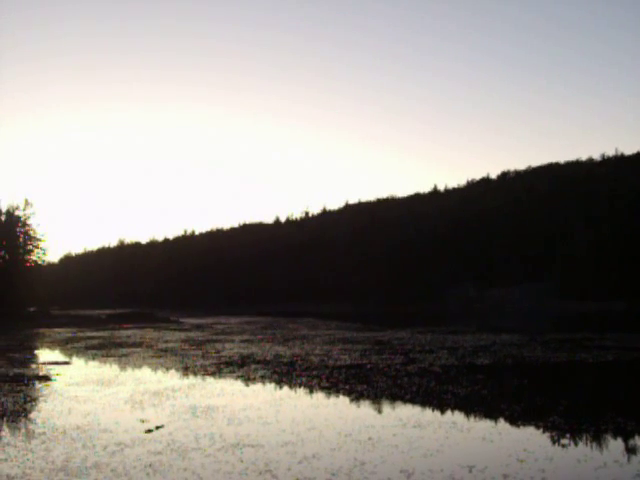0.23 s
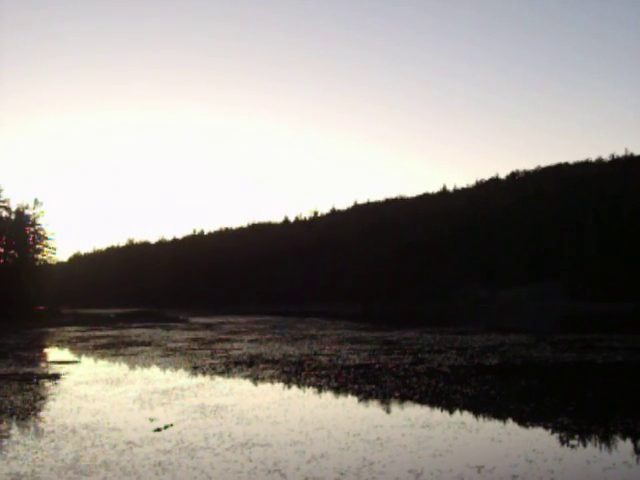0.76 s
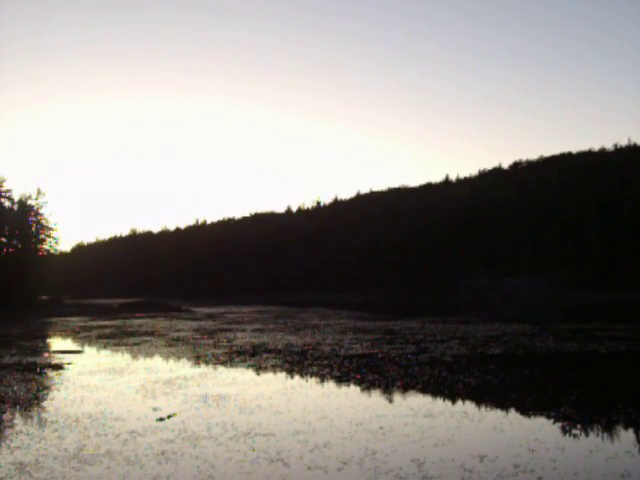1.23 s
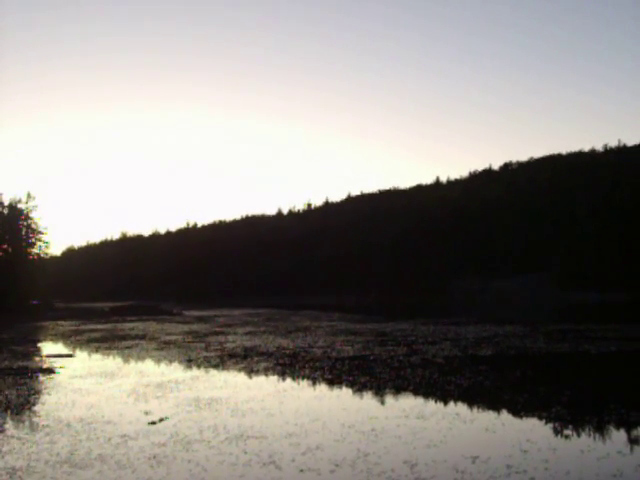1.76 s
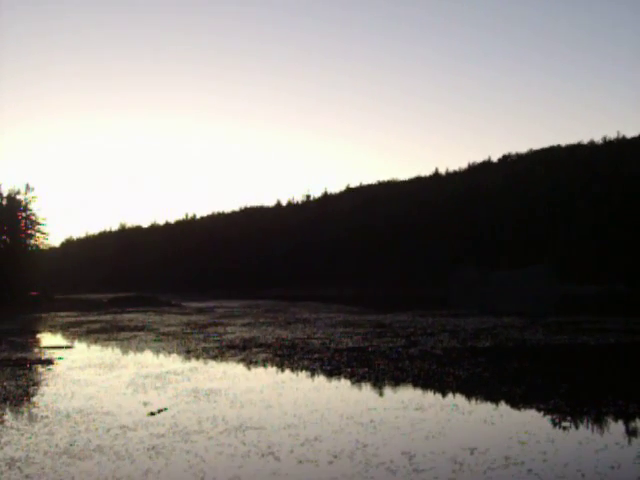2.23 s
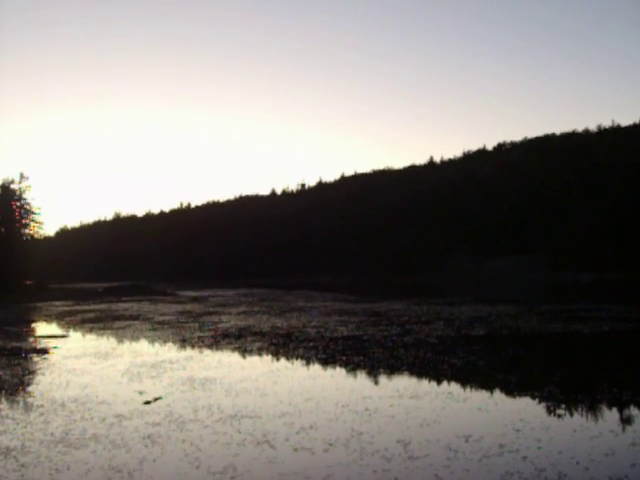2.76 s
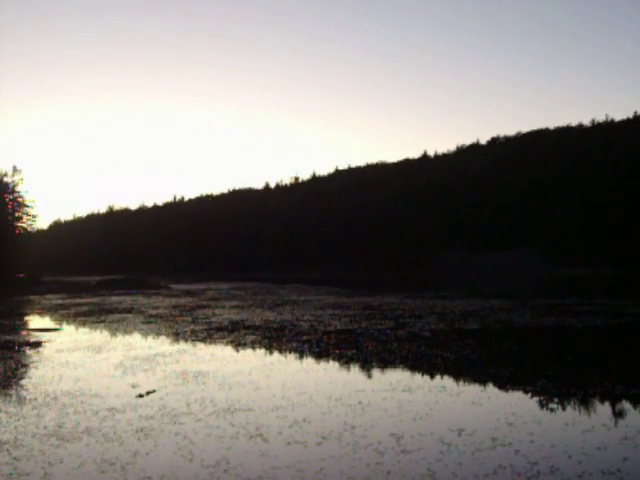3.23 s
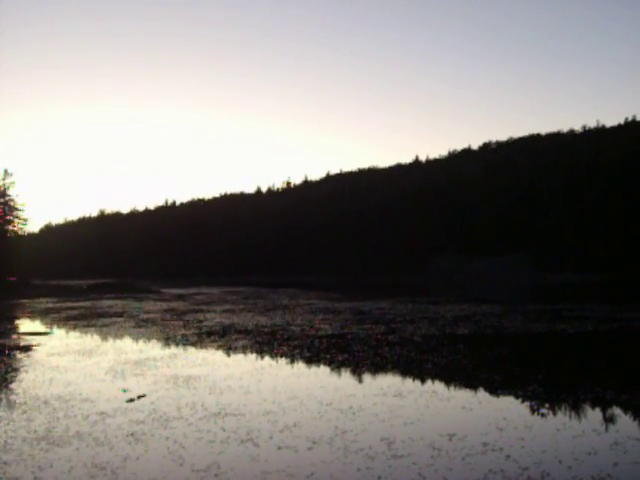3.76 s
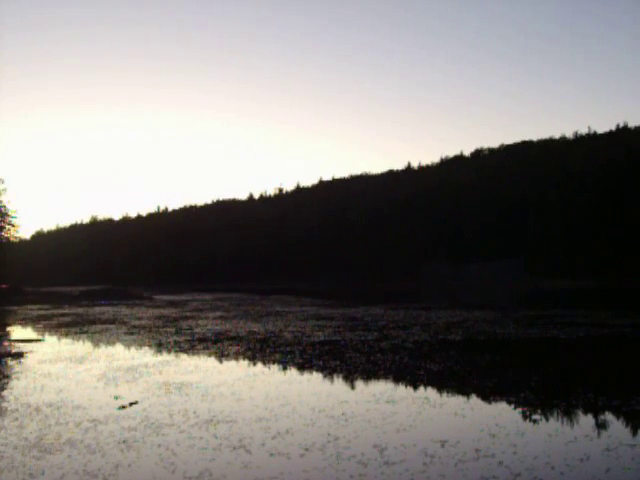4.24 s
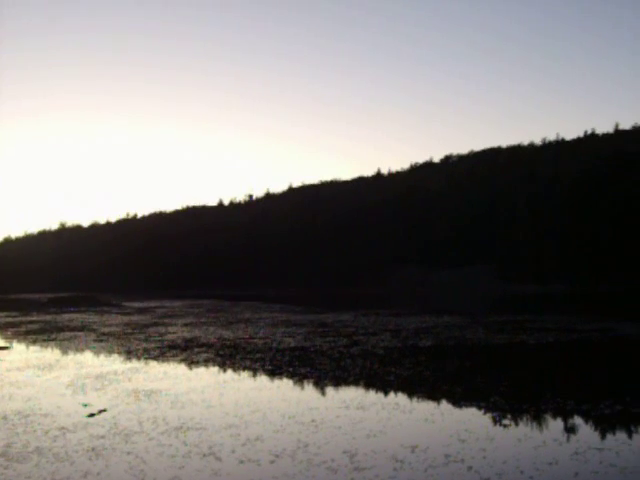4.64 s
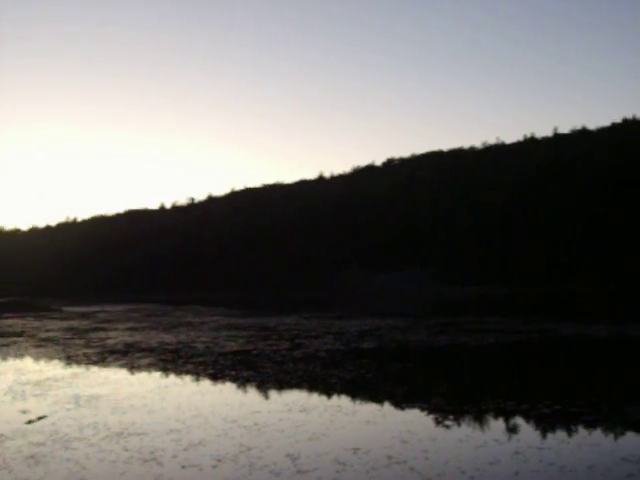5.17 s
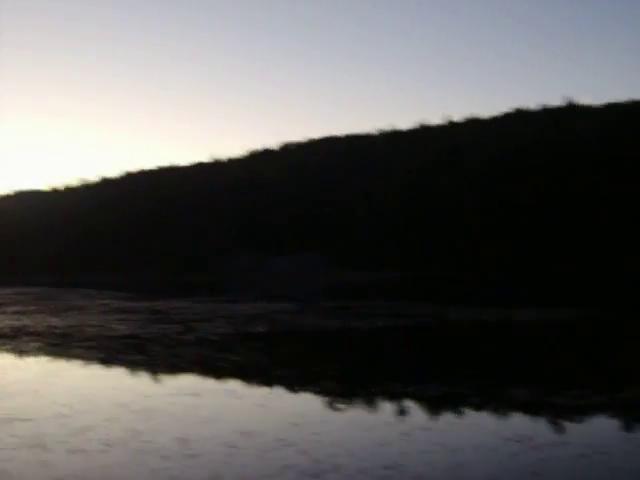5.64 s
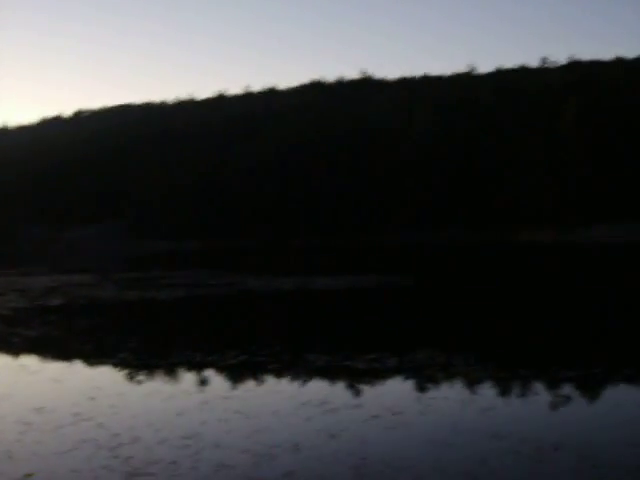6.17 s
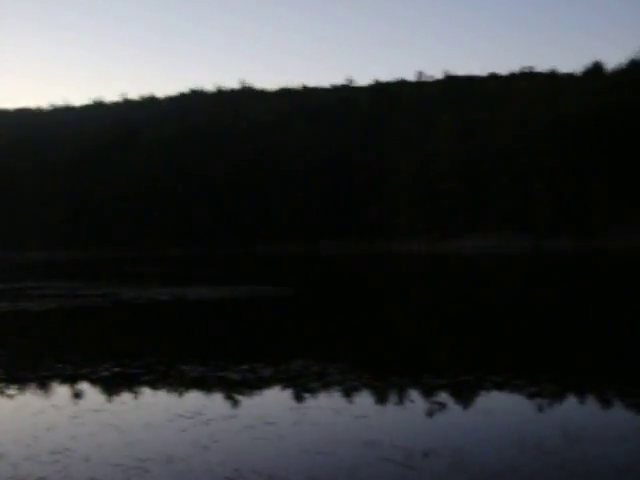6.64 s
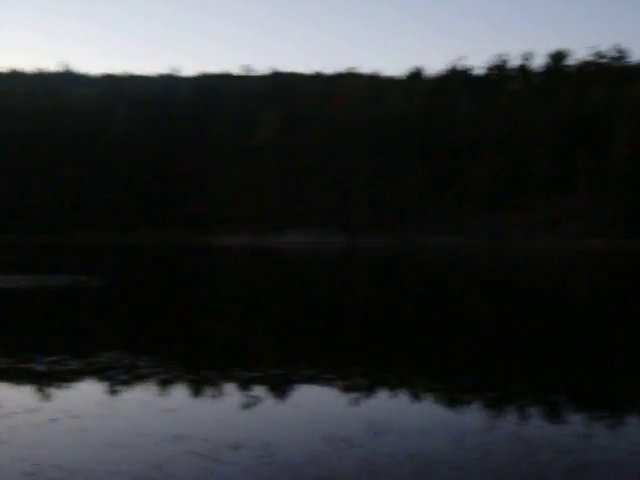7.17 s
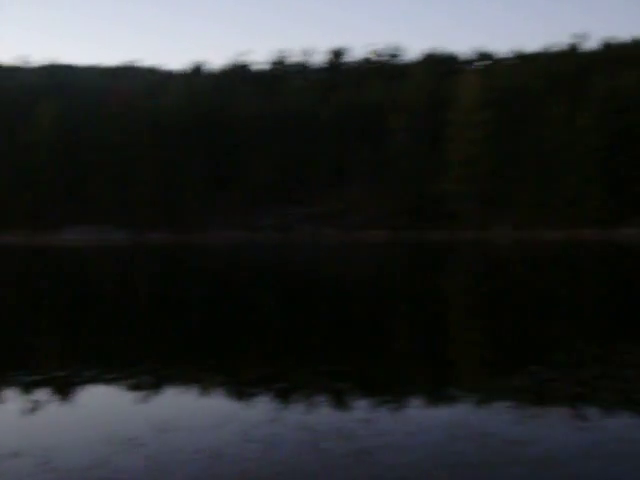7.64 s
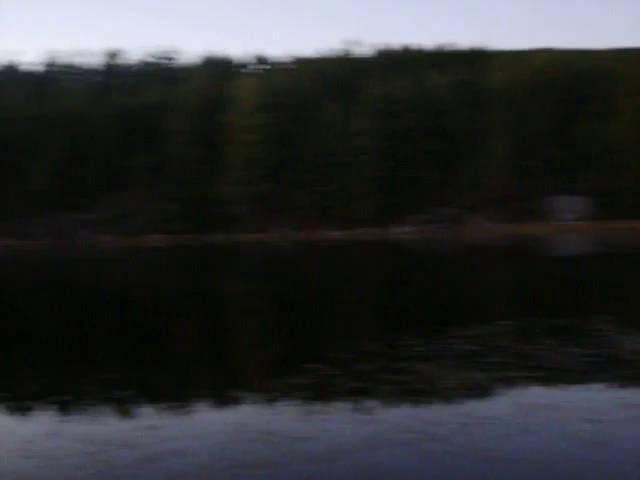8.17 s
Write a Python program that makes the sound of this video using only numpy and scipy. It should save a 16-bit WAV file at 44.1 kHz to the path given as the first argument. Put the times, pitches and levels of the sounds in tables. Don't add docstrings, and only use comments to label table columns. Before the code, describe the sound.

Close, dry clicks from fingers on a plastic camera casing punctuate a quiet evening pond. Crickets pulse throughout: one quick even trill, one slower triple chirp, plus a faint far chorus. A barely audible, steady-pitched distant howl and its echo fade early. After five seconds the handling grows busy with snaps, hard knocks and skin squeaks, while the trill dims. Narrow, hissy small microphone with slightly gritty treble.

```python
import sys
import numpy as np
from scipy import signal
from scipy.fft import rfft, irfft
from scipy.io import wavfile
from scipy.ndimage import uniform_filter1d

SR = 44100
rng = np.random.default_rng(int(sys.argv[2]) if len(sys.argv) > 2 else 0)


def voltage_ratio(decibels):
    exponent = np.asarray(decibels, float) / 20
    return 10 ** exponent


def waveform_to_disk(signal):
    frames = np.transpose(np.atleast_2d(signal))
    scaled = np.clip(frames, -1, 1) * 32767
    samples = np.round(scaled).astype(np.int16)
    wavfile.write(sys.argv[1], SR, samples)


N = 369999

# (frequency [Hz], density [dB])
HISS_SPECTRUM = [(12, -39.5), (20, 0), (34, -12), (49, -22), (97, -7.5), (360, -9), (604, -12), (820, -13),
                 (1580, -18.5), (2200, -17), (3060, -19.5), (4150, -16.5), (5500, -32), (7150, -60),
                 (12100, -120)]
CHORUS_SPECTRUM = [(3000, -33.5), (3700, -5), (4200, 4), (4700, -2), (5100, -8), (5500, -17)]
RUB_SPECTRUM = [(100, -29), (200, -7), (330, -0.5), (700, -10), (1200, -6), (2000, -20), (3000, -14.5),
                (4200, -11), (5500, -23)]
# (time [s], level [dB])
CHORUS_LEVEL = [(0, -49.5), (3, -49.5), (5.5, -49), (6.2, -48.5), (7, -47), (7.6, -47.5), (8.4, -46)]
# (time [s], level [dB], brightness [dB/octave])
RUB_LEVEL = [(4.9, -52, -2), (5.32, -39, -5), (6.0, -46.5, -0.5), (6.23, -46.5, 0.5), (6.7, -36.5, -1),
             (6.99, -39, 1.5), (7.11, -42.5, -0.5), (7.63, -38.5, 0.5), (7.91, -56, 2), (8.2, -49.5, 3)]
# (middle [s], length [s], rms [dB], centre [Hz], width [Hz])
CREAKS = [
    (6.472, .04, -41.5, 494, 512),
    (6.551, 0.046, -34.5, 1000, 900),
    (7.106, .14, -42, 874, 1205),
    (7.109, 0.11, -42, 3600, 2220),
    (7.439, 0.037, -37.5, 875, 694),
    (7.482, 0.033, -55, 700, 610),
    (7.802, 0.055, -45, 350, 150),
    (5.264, 0.1, -54, 336, 205),
    (5.661, 0.044, -53, 385, 302),
]
# (frequency [Hz], level [dB], t60 [s])
SNAP_MODES = [
    (4104, 2, 0.0071),
    (3610, -3.5, 0.012),
    (3324, -5.5, 0.007),
]
KNOCK_MODES = [
    (1000, -10, 0.013),
    (1293, -8.5, 0.018),
    (1650, -7.5, 0.015),
    (1928, -1.5, .016),
    (2360, -7.5, 0.012),
]
MID_MODES = [
    (2520, 1, 0.0058),
    (2853, -0.31, 0.012),
]
# (time [s], peak [dB], middle modes re snap [dB], scratch [ms])
SNAPS = [(0.5695, -32.5, -1, 1), (1.0057, -37, -16, 0.88), (1.031, -24, -18, 0.26),
         (1.4074, -6.5, -13.5, .8), (1.455, -26, -12, .7), (1.8123, -7, -7.5, 1.1),
         (1.8844, -22.5, -16.5, 1), (3.5603, -39, 1.5, .8), (3.8629, -19.5, -8, 0.77),
         (5.1132, -4.5, -13.5, 0.44), (5.743, -9, -11, 1.1), (5.865, -46, 7.5, .8),
         (6.1427, -20, -0.5, .63), (6.5722, -13.5, -15.5, 0.47), (6.7482, -38.5, 0.5, .5),
         (6.873, -24.5, -18, .8), (7.6353, -21, -24, 0.5), (7.851, -5, -11.5, .4), (8.107, -21.5, -30, .35),
         (8.341, -9.5, -12, 0.5)]
# (time [s], peak [dB], middle modes re slip [dB], scratch [ms])
SLIPS = [
    (1.4026, -20.5, -5, 2.2),
    (1.8062, -27, -22, 1.8),
    (1.811, -21, -5, 1.5),
    (6.146, -12.5, -22, 1.3),
    (6.57, -22.5, -9, 1.8),
    (7.2443, -25.5, -22, 3.3),
    (7.257, -28, -25, 2),
    (7.287, -42, 1, 1.6),
]
# (time [s], peak [dB], snap modes re knock [dB], middle modes re knock [dB], scratch [ms])
KNOCKS = [
    (3.4875, -13, -29, -17, 0.51),
    (3.621, -18.5, -26, -11, .67),
    (5.764, -9.5, -11.5, -20, .35),
    (6.2422, -2.5, -10, -10, 1),
    (6.6089, -1, -12, -12.5, 0.57),
    (7.2678, -11, -9.5, -20, 1.7),
]
BUMPS = [
    (1.8129, -21, -20, -5, 2.5),
    (2.295, -24.5, -18, -14, 0.87),
    (3.5145, -25, -30, -16, .45),
    (6.257, -23.5, -19, -8.5, 1.8),
    (6.4894, -31, -10, -10, 0.88),
    (6.56, -39, -23, -25, 0.44),
    (6.616, -13, -13, -7.5, 4.7),
]
# (low edge [Hz], high edge [Hz])
TICK_BAND_HZ = [2150, 5200]
# (time [s], peak [dB], recovery [ms])
THUMPS = [
    (1.4077, -17, 5.8),
    (1.8121, -16.5, 10),
    (5.1132, -14.5, 10.4),
    (7.8508, -14.5, 7.8),
]
# (time [s], frequency [Hz], peak [dB], t60 [s])
TINGS = [
    (6.145, 5483, -34, .17),
    (6.145, 2595, -34, .2),
    (6.592, 5483, -48, .2),
    (7.6345, 5000, -22, .008),
    (1.031, 5000, -30, .008),
    (7.245, 5000, -32, .008),
]
# (delay [s], frequency [Hz], level re knock [dB], t60 [s])
KNOCK_TING = (.004, 2672, -21.5, .085)
# (first stroke [s], peak [dB])
CHIRPS = [(.74, -45), (1.08, -38.5), (1.469, -39), (1.983, -38), (2.638, -36.5), (3.331, -43),
          (3.897, -39.5), (4.271, -44), (4.697, -36), (5.202, -35.5), (5.622, -36.5), (6.047, -35.5),
          (6.372, -42), (6.849, -46), (7.361, -40.5), (7.781, -34.5), (8.347, -43)]
# (level [dB] of first, second, third)
CHIRP_STROKES_DB = (-3, -0.5, -0.5)
# (time [s], peak [dB])
TRILL_LEVEL = [(0, -33), (2, -33), (4, -33.5), (5.3, -34.5), (5.9, -37.5), (6.3, -41), (7, -41), (7.5, -46)]
ODD_PHRASES = [(6, -1), (8, -1), (9, -1), (11, -1), (13, -1), (18, -1), (21, -1), (34, -1), (38, -1),
               (39, 1)]
# (time [s], pitch [Hz], voice rms [dB], echo rms [dB])
HOWL = [(0, 757, -53, -54), (.66, 760, -58, -55.5), (.8, 764, -61, -63), (1.1, 771, -58, -59),
        (1.5, 758, -63, -60), (2, 765, -61, -68), (2.5, 735, -66, -71), (2.75, 727, -68, -70),
        (3, 730, -90, -91)]
# (frequency [Hz], level [dB])
MIRROR = [(5512, 0), (5812, -6.6), (6012, -12), (6412, -21), (6812, -34), (7212, -51), (7450, -62),
          (7800, -130)]


def evened(x):
    return x / np.sqrt(np.mean(x ** 2) + 1e-20)


def read(points, hz):
    f, value = np.transpose(points)
    return np.interp(np.log(hz + 1), np.log(f + 1), value)


def flat(points, hz):
    db = read(points, hz)
    return db - 10 * np.log10(np.mean(voltage_ratio(db) ** 2))


def curve(points, t, axis=1):
    rows = np.array(points)
    return np.interp(t, rows[:, 0], rows[:, axis])


def add(mix, s, sound):
    if s >= 0:
        part = mix[round(s * SR):][:len(sound)]
        part += sound[:len(part)]


def noise(field_db, patchy_db, size=512):
    frames = 4 * N // size + 5
    hz = np.fft.rfftfreq(size, 1 / SR)[:, None]
    t = np.arange(frames) * size / 4 / SR
    real, imag, patches = rng.standard_normal((frames, len(hz), 3)).T
    patches = evened(uniform_filter1d(uniform_filter1d(patches, 6, 0), 14, 1))
    gain = voltage_ratio(field_db(hz, t) + patchy_db * patches)
    spectrum = real + 1j * imag
    white, shaped = signal.istft([spectrum, spectrum * gain], nperseg=size, noverlap=3 * size // 4)[1]
    return shaped[:N] / white.std()


def ring(modes, length_s):
    t = np.arange(round(length_s * SR)) / SR
    out = np.zeros(len(t))
    for k, (hz, db, t60_s) in enumerate(modes):
        out += (-1) ** k * voltage_ratio(db - 60 * t / t60_s) * np.sin(2 * np.pi * hz * t)
    return out


def stroke(start_hz, end_hz, length_s, bend, rise, fall_s):
    u = np.arange(round(length_s * SR)) / SR / length_s
    hz = start_hz + (end_hz - start_hz) * u ** bend
    shape = u ** rise * np.clip((1 - u) * length_s / fall_s, 0, 1)
    return shape / shape.max() * np.sin(2 * np.pi * (np.cumsum(hz) / SR + rng.random()))


def hiss():
    return voltage_ratio(-42.5) * noise(lambda hz, t: flat(HISS_SPECTRUM, hz), patchy_db=1.02, size=1024)


def far_chorus():
    return noise(lambda hz, t: flat(CHORUS_SPECTRUM, hz) + curve(CHORUS_LEVEL, t), patchy_db=1.5, size=256)


def finger_rub():
    levels = [(0, -64.5, 0.01), (4.8, -72, 0.012)] + list(RUB_LEVEL)

    def field_db(hz, t):
        octaves = np.log2(np.clip(hz, 100, 5500) / 500)
        return flat(RUB_SPECTRUM, hz) + curve(levels, t) - 6 + curve(levels, t, axis=2) * octaves

    return noise(field_db, patchy_db=2.5)


def creaks():
    out = np.zeros(N)
    slips_per_s = 1500
    for s, length_s, db, hz, width_hz in CREAKS:
        when, size, sign = rng.random((3, SR // 4))
        sound = (when < slips_per_s / SR) * voltage_ratio(-2.5 * np.log(size + 1e-2)) * np.sign(sign - .5)
        for q in (hz / width_hz, hz / width_hz / 1.3):
            sound = signal.lfilter(*signal.iirpeak(hz, q, SR), sound)
        sound = sound[:round(min(2 * length_s, .25) * SR)]
        add(out, s - len(sound) / SR / 2, voltage_ratio(db) * evened(sound) * np.hanning(len(sound)))
    return out


def bandpass(x, order, band_hz):
    return signal.sosfilt(signal.butter(order, band_hz, "band", fs=SR, output="sos"), x)


def casing():
    out, t = np.zeros(N), np.arange(600) / SR
    snap_knock_db, knock_snap_s = -21.5, .0014
    tick_db, rattle, rattle_s = -13.5, .02, .005
    snap_shell = bandpass(ring(SNAP_MODES, .032), 4, [2760, 4600])
    knock_shell = bandpass(ring(KNOCK_MODES, .032), 4, [590, 4600])
    mid_shell = bandpass(ring(MID_MODES, .032), 4, [2180, 4600])
    tick = bandpass(1. * (t == 0), 2, TICK_BAND_HZ)

    # time, snap dB, knock dB, middle dB, scratch ms, snap delay s
    clicks = [(s, db, db + snap_knock_db, db + mid_db, ms, 0)
              for s, db, mid_db, ms in list(SNAPS) + list(SLIPS)]
    clicks += [(s, db + snap_db, db, db + mid_db, ms, knock_snap_s)
               for s, db, snap_db, mid_db, ms in list(KNOCKS) + list(BUMPS)]
    for s, snap_db, knock_db, mid_db, ms, snap_s in clicks:
        scratch = rng.standard_normal(600)
        blow = (t == 0) + .099 * scratch * np.exp(-t * 1000 / ms)
        blow += rattle * scratch * np.exp(-t / rattle_s)
        parts = [(snap_shell, snap_db, snap_s), (knock_shell, knock_db - .5, 0),
                 (mid_shell, mid_db + 6, .0003), (tick, snap_db + tick_db, snap_s + .0004)]
        for shell, db, late_s in parts:
            sound = np.convolve(blow, shell)
            add(out, s + late_s - .0003, voltage_ratio(db) * sound / abs(sound).max())
    return out


def thumps():
    out, t = np.zeros(N), np.arange(4000) / SR
    for s, db, recovery_ms in THUMPS:
        push = .93 * np.exp(-((t - .0005) / .00023) ** 2)
        suction = (t > .0008) * np.exp(-t * 1000 / recovery_ms)
        add(out, s, voltage_ratio(db) * signal.lfilter(*signal.butter(2, 1500, fs=SR), push - suction))
    return out


def tings():
    out, length_s, attack_s = np.zeros(N), .3, .00048
    delay_s, knock_hz, knock_db, knock_t60_s = KNOCK_TING
    events = list(TINGS) + [(s + delay_s, knock_hz, db + knock_db, knock_t60_s) for s, db, *_ in KNOCKS]
    attack = 1 - np.exp(-np.arange(round(length_s * SR)) / SR / attack_s)
    for s, hz, db, t60_s in events:
        add(out, s, ring([(hz, db, t60_s)], length_s) * attack)
    return out


def chirps():
    out = np.zeros(N)
    gap_s, uneven_db = .0405, .8
    for s, db in CHIRPS:
        for k, stroke_db in enumerate(CHIRP_STROKES_DB):
            sound = stroke(5000, 4330, .023, bend=2.1, rise=.4, fall_s=.006)
            level_db = db + stroke_db + uneven_db * rng.standard_normal()
            add(out, s + .002 + gap_s * k, voltage_ratio(level_db) * sound)
    return out


def trill():
    out, odd = np.zeros(N), dict(ODD_PHRASES)
    start_s, phrase_s, extra_s, stroke_s = -.0642, .15179, .02525, .02445
    last_stroke_db, uneven_db = -10, 1
    for phrase in range(51):
        extra = odd.get(phrase, 0)
        last = 5 + extra
        for k in range(last + 1):
            s = start_s + stroke_s * k
            db = curve(TRILL_LEVEL, s) + last_stroke_db * (k == last) + uneven_db * rng.standard_normal()
            add(out, s + .0002, voltage_ratio(db) * stroke(4783, 3830, .0107, bend=1.4, rise=.85, fall_s=.0012))
        start_s += phrase_s + extra_s * extra
    echo = voltage_ratio(-17.5) * np.roll(out, round(.0048 * SR)) + voltage_ratio(-21) * np.roll(out, round(.011 * SR))
    return out + echo


def howl():
    t, out = np.arange(N) / SR, np.zeros(N)
    throb_hz, throb_range_db, first_swell_s = 3.9, 3.8, .09
    echo_hz = 25.5
    throb_db = throb_range_db * np.cos(2 * np.pi * throb_hz * (t - first_swell_s))
    for k in range(2):
        drift = uniform_filter1d(uniform_filter1d(rng.standard_normal(N), 3000), 3000)
        waver_hz = 2.5 * evened(drift)
        turns = np.cumsum(curve(HOWL, t) + k * echo_hz + waver_hz) / SR
        out += voltage_ratio(curve(HOWL, t, axis=2 + k) + throb_db) * np.sqrt(2) * np.sin(2 * np.pi * turns)
    return out


def scene():
    background = hiss() + far_chorus() + finger_rub()
    handling = creaks() + casing() + thumps() + tings()
    return (background + handling + chirps() + trill() + howl())[None]


def roll_off(x):
    return signal.sosfilt(signal.butter(12, 7480, fs=SR, output="sos"), x)


def record(dry):
    ceiling, offset = .95, -.0064
    size = N + -N % 4
    hz = np.fft.rfftfreq(size, 1 / SR)
    limited = ceiling * np.tanh((dry + offset) / ceiling)
    edge = np.clip((SR / 8 + 250 - hz) / 250, 0, 1)
    slow = irfft(rfft(limited, size) * edge, size) * 4 * (np.arange(size) % 4 == 0)
    smooth = irfft(rfft(slow) * voltage_ratio(read(MIRROR, hz)), size)[:, :N]
    return roll_off(smooth)


dry = scene()
out = record(dry)
waveform_to_disk(out)
```